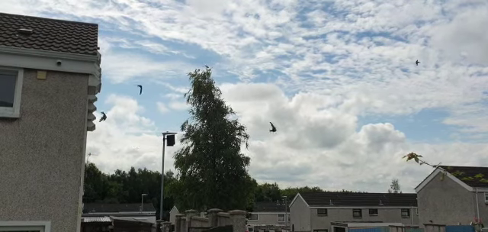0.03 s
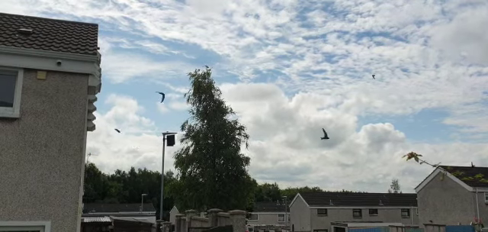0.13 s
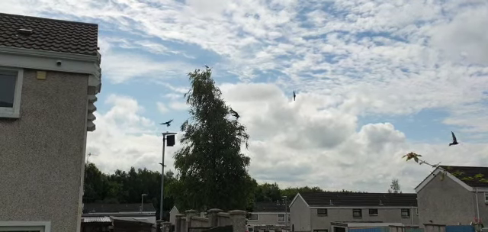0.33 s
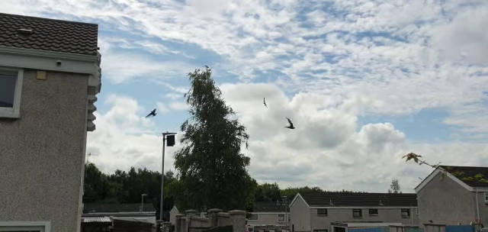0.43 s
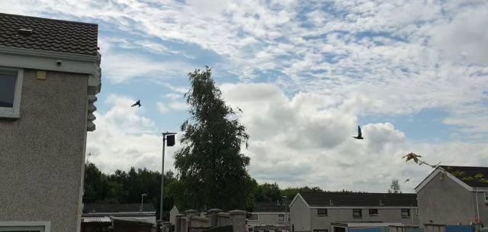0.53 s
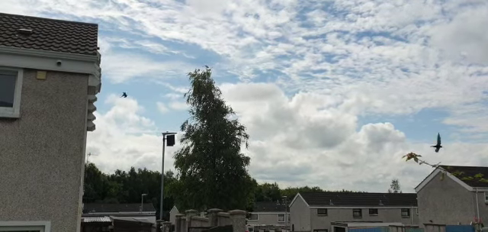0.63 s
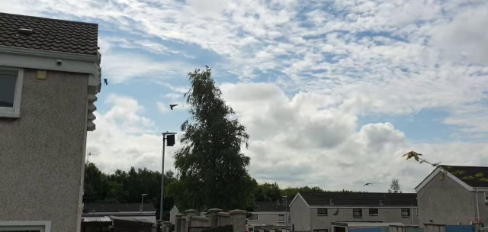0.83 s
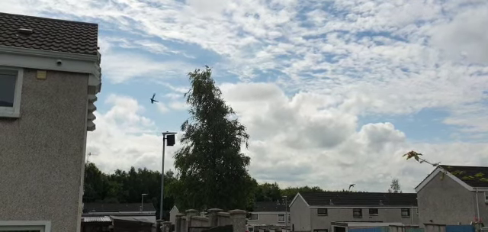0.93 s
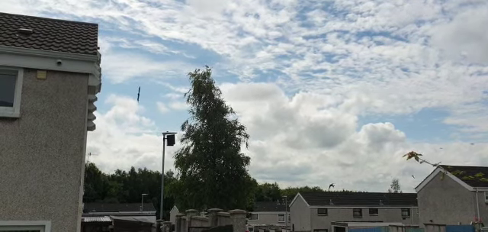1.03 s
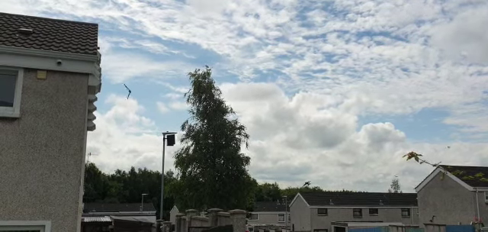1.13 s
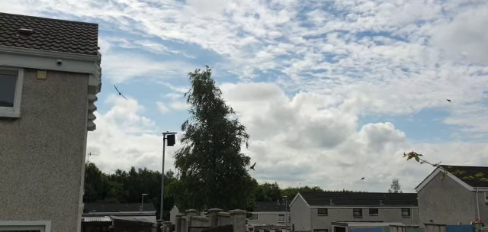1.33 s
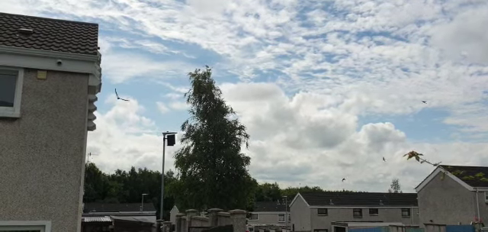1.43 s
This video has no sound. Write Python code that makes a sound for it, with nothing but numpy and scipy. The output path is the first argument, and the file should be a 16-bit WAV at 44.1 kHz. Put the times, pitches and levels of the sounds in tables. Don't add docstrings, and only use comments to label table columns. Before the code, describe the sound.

Swifts screaming shrilly between houses, one close buzzy scream breaking into a falling trill

```python
import sys
import numpy as np
from scipy import signal
from scipy.fft import rfft, irfft
from scipy.io import wavfile

SR = 44100
rng = np.random.default_rng(int(sys.argv[2]) if len(sys.argv) > 2 else 0)


def digitize_waveform(pressure):
    field = np.atleast_2d(pressure).T
    bounded = np.clip(field, -1, 1)
    quanta = np.round(bounded * 32767).astype(np.int16)
    wavfile.write(sys.argv[1], SR, quanta)


def attenuation_scalar(level_db):
    decades = np.asarray(level_db, float) / 20
    return 10 ** decades


N = 66150
LEAD = 22050
ALL = N + LEAD
EDGE_S = .0015


def evened(x):
    return x / np.sqrt(np.mean(abs(x) ** 2) + 1e-20)


def read(points, hz):
    f, value = np.transpose(points)
    return np.interp(np.log(hz + 1), np.log(f + 1), value)


def drift(count, hz):
    z = rng.standard_normal(count) + 1j * rng.standard_normal(count)
    spectrum_shape = np.exp(-(np.fft.fftfreq(count, 1 / SR) / hz) ** 2)
    return evened(np.fft.ifft(np.fft.fft(z) * spectrum_shape))


def placed(s, sound):
    out = np.zeros((2, ALL + SR))
    at = LEAD + round(s * SR)
    out[:, at:at + sound.shape[-1]] = sound
    return out[:, :ALL]


def whistle(turns, swing, partials):
    return sum(attenuation_scalar(db) * np.exp(1j * k * (turns + swing)) for k, db in partials)


def scream(rows, flutter, flutter_hz, octave_db, half_db, third_db=-80):
    s, *cols = np.transpose(rows)
    t = np.arange(s[0], s[-1], 1 / SR)
    hz, db, buzz_hz, depth = (np.interp(t, s, c) for c in cols)
    buzz_jitter, pitch_jitter_hz = .18, 40
    buzz = 2 * np.pi * np.cumsum(buzz_hz * (1 + buzz_jitter * drift(len(t), 91.4).real)) / SR
    turns = 2 * np.pi * np.cumsum(hz + pitch_jitter_hz * drift(len(t), 120).real) / SR
    swing = .25 * np.sin(buzz)
    rasp = attenuation_scalar(-13) * drift(len(t), 470)

    lower = whistle(turns, swing, [(1, 0.03)])
    lower = lower * (1 + depth * np.cos(buzz) + rasp)
    upper = whistle(turns, 2.4 * swing, [(2, octave_db), (1.5, half_db), (3, third_db)])
    upper = upper * (1 + np.cos(buzz - .8) + 4.5 * rasp)

    def fading():
        return (1 + flutter * drift(len(t), flutter_hz)) / np.hypot(1, flutter)

    ports = np.array([(fading() * lower + fading() * upper).real for _ in "lr"])
    ends = np.clip(np.minimum(t - s[0], s[-1] - t) / EDGE_S, 0, 1)
    return placed(s[0], np.sqrt(2) * ends * attenuation_scalar(db) * ports)


def rumble_and_hiss():
    # f/Hz, level/dB
    hum = [(22, -26), (48, -6.5), (57, -16.5), (67, 1), (80, -14.5), (220, -27.5), (850, -31.5),
           (2000, -34)]
    # f/Hz, level/dB
    hiss = [(3300, -42), (5500, -37.5), (6800, -56), (7700, -63), (8500, -43.5), (9800, -46), (12000, -39),
            (15500, -47)]
    # f/Hz, level difference/dB
    balance = [(60, 17.5), (110, 18), (200, 10), (350, -0.5), (1000, -3), (3000, -5.5), (8000, 4),
               (15000, 4.5)]
    # f/Hz, correlation/1
    coherence = [(40, .95), (100, .92), (180, .68), (350, .4), (700, .15), (1400, 0)]
    hz = np.fft.rfftfreq(N, 1 / SR)
    a, b, c, d = rng.standard_normal((len(hz), 4)).T
    same = np.clip(read(coherence, hz), -1, 1)
    tilt = attenuation_scalar(read(balance, hz))
    left = a + 1j * b
    right = same * left + np.sqrt(1 - same ** 2) * (c + 1j * d)
    z = np.array([left * tilt, right]) / np.hypot(1, tilt)
    return attenuation_scalar(-66) * evened(irfft(z * attenuation_scalar(read(hum + hiss, hz)), N))


def far_birds():
    # t/s, f/Hz, level/dB
    calls = [
        [(.945, 5250, -56), (.975, 5650, -47), (1.015, 5980, -41), (1.07, 6150, -44), (1.11, 6330, -42),
         (1.14, 6450, -38), (1.22, 6450, -40), (1.32, 6460, -41), (1.42, 6400, -45)],
        [(.36, 6000, -60), (.45, 6300, -43), (.58, 6300, -40), (.72, 6050, -42), (.79, 6300, -44),
         (.9, 6300, -56)],
        [(.96, 5350, -62), (1.03, 5650, -48), (1.22, 5850, -46), (1.35, 5950, -43), (1.44, 5950, -42),
         (1.56, 5700, -47)],
        [(.98, 4700, -72), (1.07, 4800, -59), (1.2, 4850, -58), (1.36, 4900, -68)],
        [(.68, 5500, -58), (.76, 5450, -47), (.87, 5480, -54), (.92, 5400, -70)],
        [(-.3, 5200, -45), (-.02, 4900, -47), (.04, 4700, -52), (.12, 4500, -62)],
        [(-.3, 6200, -50), (-.02, 6150, -55), (.06, 6150, -57), (.18, 6150, -66)],
        [(.21, 5500, -56), (.214, 5500, -48), (.235, 5500, -56)],
    ]
    # echo/dB, buzz f/Hz, buzz depth/1, flutter share/1, flutter f/Hz, octave/dB, half line/dB
    air = [(-4.5, 260, 0, 0.46, 50, -51, -47), (-5.5, 500, 0.14, 1, 687, -38.5, -42.5),
           (-4, 210, 0, 0.83, 730, -55, -57), (-11, 250, 0.3, 6, 480, -51.5, -45),
           (-3.5, 110, 0, 1.3, 277, -59.5, -66), (-10.5, 600, 0.6, 9, 430, -26.5, -47),
           (-14, 690, 0, 2.5, 240, -46.5, -49), (9, 300, 0.4, 2.7, 550, -35.5, -47)]
    direct, to_walls = 0, 0
    for rows, (echo_db, buzz_hz, depth, *colour) in zip(calls, air):
        bird = scream([(*row, buzz_hz, depth) for row in rows], *colour)
        direct = direct + bird
        to_walls = to_walls + attenuation_scalar(echo_db) * bird
    return direct, to_walls


def wall_echoes(x):
    # f/Hz, t60/s
    decay = [(3500, .9), (6000, .75), (9000, .4), (14000, .3)]
    gap_s = 0.004
    taps = rng.standard_normal((2, SR)) * (rng.random((2, SR)) < .05)
    taps = taps * (np.arange(SR) > gap_s * SR)
    hz, t, z = signal.stft(taps, SR, nperseg=256)
    tail = signal.istft(z * attenuation_scalar(-60 * t / read(decay, hz)[:, None]), SR, nperseg=256)[1]
    tail = tail / np.linalg.norm(tail[0]) * attenuation_scalar(np.array([[4], [0]]))
    blurred = x * drift(ALL, 163).real * np.sqrt(2)
    return signal.fftconvolve(blurred, tail, axes=1)[:, :ALL]


def near_scream():
    # t/s, level/dB, buzz f/Hz, buzz depth/1
    buzzed = [
        (.218, -52, 291.4, 0.55),
        (0.231, -33, 285.7, 0.6),
        (0.264, -26, 278.1, 0.2),
        (0.308, -25, 271.2, 0.5),
        (0.35, -28, 268.2, 0.7),
        (0.38, -23, 243.7, 0.4),
        (0.423, -27.5, 234.2, 0),
        (.445, -23.5, 237.7, 1),
        (.47, -28, 245, 0.85),
    ]
    pitch = [4850, 5030, 5360, 5500, 5580, 5610, 5570, 5680, 5650]
    rows = [(s, hz, *rest) for hz, (s, *rest) in zip(pitch, buzzed)]
    return scream(rows, flutter=0.57, flutter_hz=80, octave_db=-29.5, half_db=-61.5, third_db=-39.5)


def note(start, length, db, hz, glide_hz):
    t = np.arange(0, length, 1 / SR)
    turns = 2 * np.pi * np.cumsum(hz + glide_hz * t / length) / SR
    shape = np.sin(np.pi / 2 * np.clip(np.minimum(t, length - t) / EDGE_S, 0, 1)) ** 2
    ripple = np.array([1 + .15 * drift(len(t), 400) for _ in "lr"])
    tone = (whistle(turns, 0, [(1, 0.015), (2, -25), (1.49, -42)]) * ripple).real
    tick_hz, tick_s = 4400, .0025
    tick = attenuation_scalar(-56) * np.sin(np.pi * np.minimum(t / tick_s, 1)) ** 2 * np.sin(2 * np.pi * tick_hz * t)
    tick = tick * (start > .53)
    return placed(start, np.sqrt(2) * (attenuation_scalar(db) * shape * tone + tick))


def near_notes():
    notes = [
        (.1968, .015, -41, 4580, 300),
        (.4768, .009, -24.5, 5630, 30),
        (.4985, .0085, -26, 5640, 20),
        (.5222, .01, -24.5, 5660, 30),
        (.5468, .0098, -28, 5620, 20),
        (.5722, .008, -30.5, 5500, 30),
        (.5958, .008, -30.5, 5350, 40),
        (.6212, .008, -38, 4780, 60),
        (.6472, .007, -51, 4250, 40),
        (.658, .006, -54, 4000, -100),
    ]
    return sum(note(*row) for row in notes)


def swifts():
    # f/Hz, level/dB
    left_port = [(2500, 2), (4300, -23.5), (5600, -20.5), (6500, -23), (7300, -30), (8500, -4.5),
                 (11000, -6.5), (15000, -8.5)]
    # f/Hz, level/dB
    beak = [(3200, -7), (4200, -1), (8500, -4), (9300, -24), (10000, -10), (11200, 4.5), (12200, -1.5),
            (15000, -3.5)]
    left_lag_s = 0.0005754
    far, far_to_walls = far_birds()
    near = near_scream() + near_notes()
    left, right = near + far + wall_echoes(attenuation_scalar(-13) * near + far_to_walls)
    hz = np.fft.rfftfreq(ALL, 1 / SR)
    lag = np.exp(-2j * np.pi * hz * left_lag_s)
    left = irfft(rfft(left) * attenuation_scalar(read(left_port, hz)) * lag, ALL)
    return irfft(rfft(np.array([left, right])) * attenuation_scalar(read(beak, hz)), ALL)[:, LEAD:]


def scene():
    return rumble_and_hiss() + swifts()


def roll_off(x):
    return signal.sosfilt(signal.butter(12, 15920, fs=SR, output="sos"), x)


def record(dry):
    return roll_off(dry)


dry = scene()
out = record(dry)
digitize_waveform(out)
```